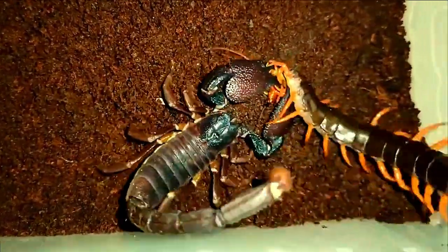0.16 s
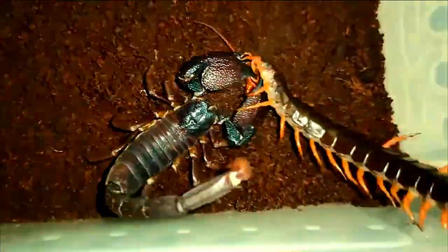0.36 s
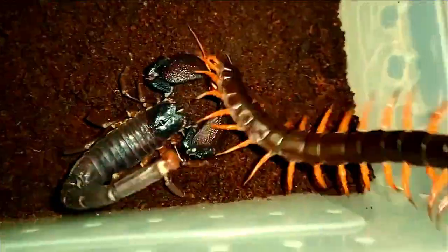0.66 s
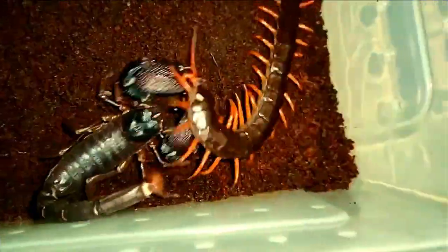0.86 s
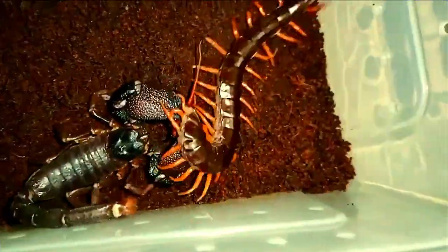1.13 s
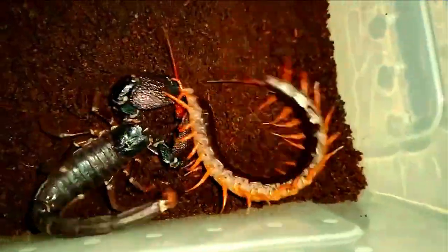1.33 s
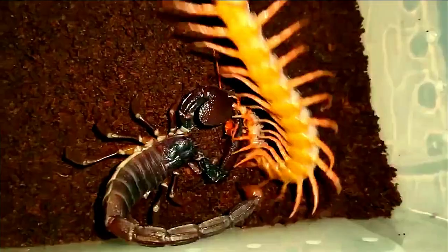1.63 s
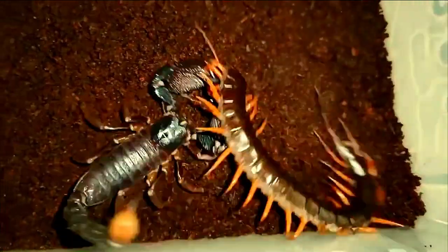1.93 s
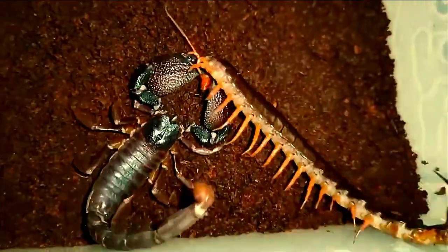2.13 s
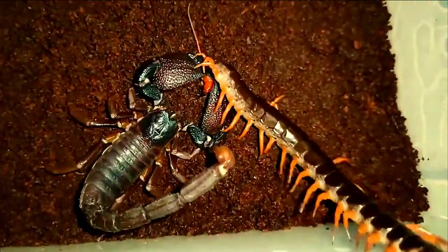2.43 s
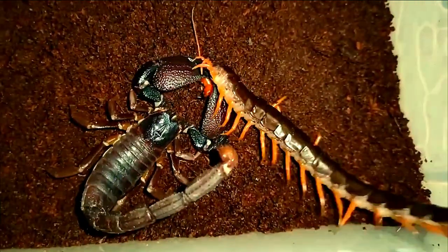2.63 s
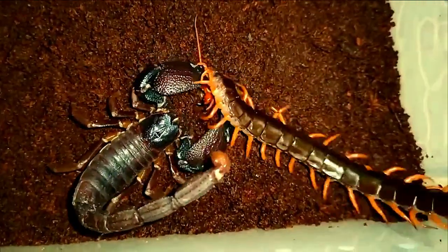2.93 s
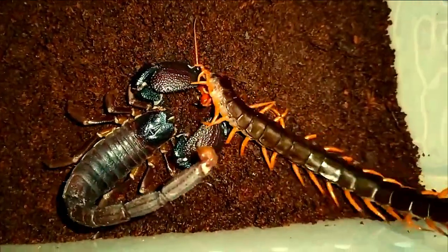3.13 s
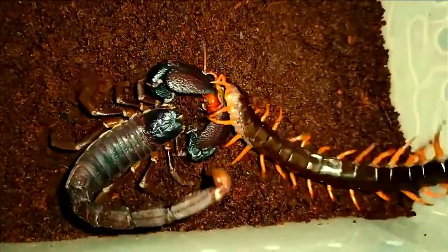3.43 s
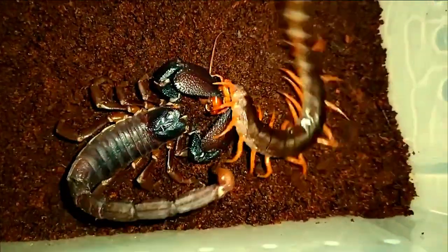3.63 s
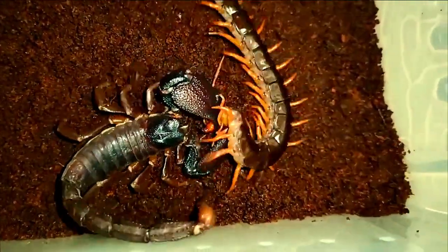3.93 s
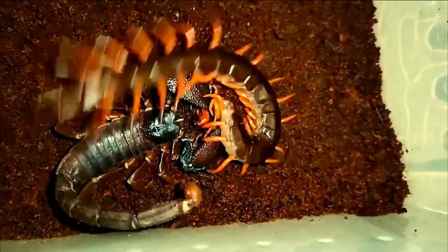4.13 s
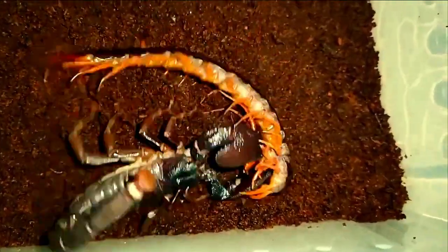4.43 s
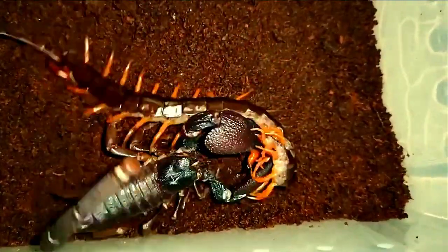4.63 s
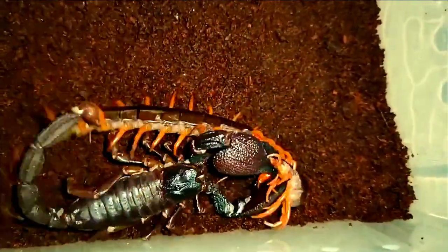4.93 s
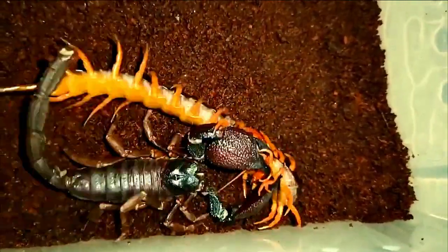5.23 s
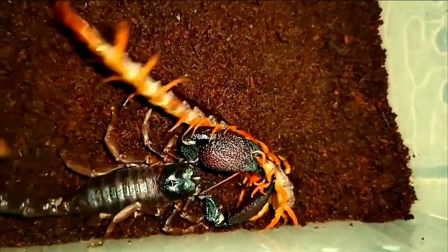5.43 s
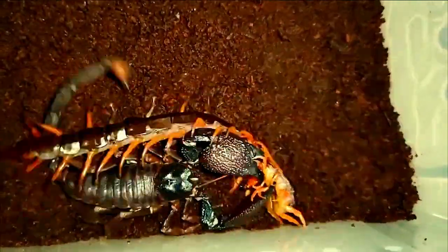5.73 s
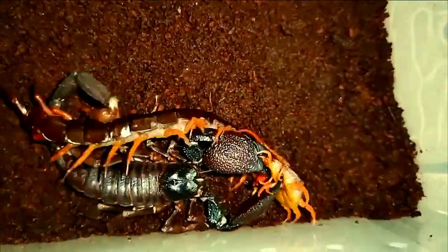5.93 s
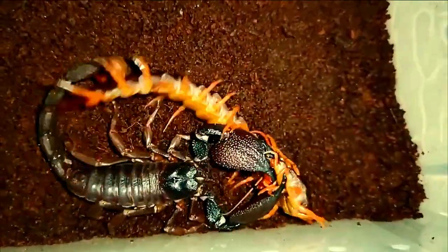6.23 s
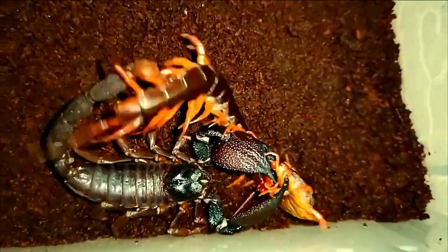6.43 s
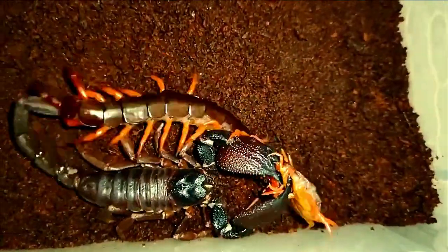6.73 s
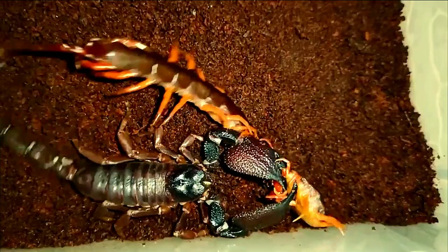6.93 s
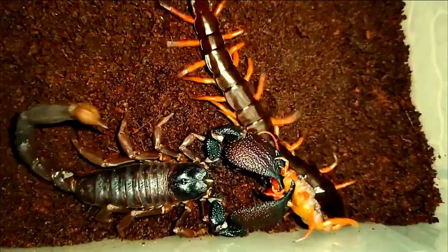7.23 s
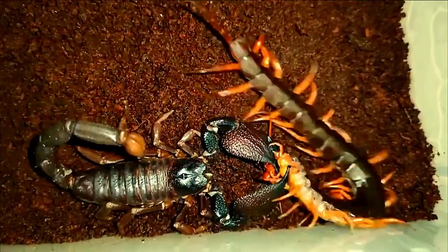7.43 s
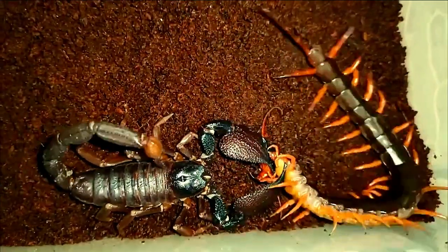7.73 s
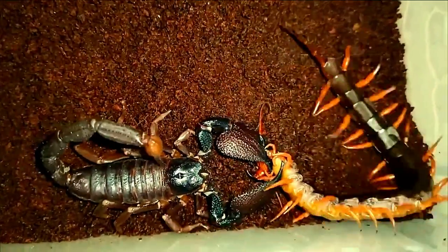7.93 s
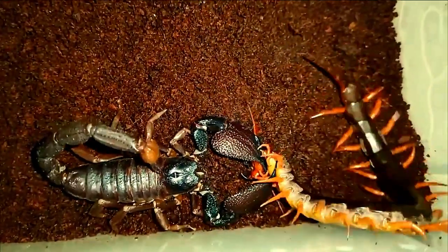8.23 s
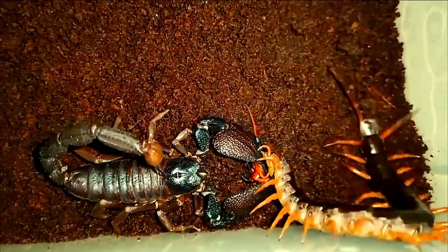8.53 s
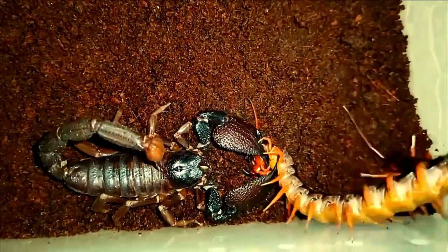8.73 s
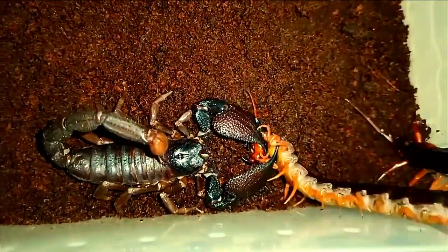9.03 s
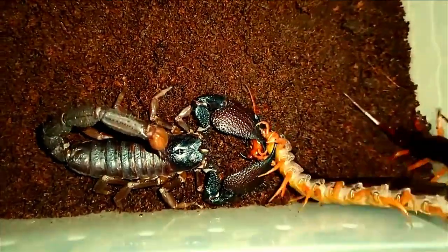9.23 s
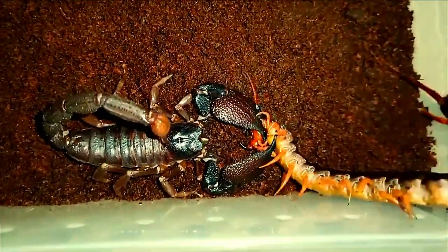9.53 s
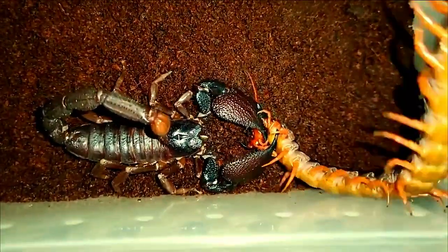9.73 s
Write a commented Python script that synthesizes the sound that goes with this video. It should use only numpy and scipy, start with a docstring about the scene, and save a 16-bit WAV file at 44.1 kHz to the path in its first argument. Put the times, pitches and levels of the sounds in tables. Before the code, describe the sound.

A close microphone catches a scuffle on loose coir in a plastic box. Dull body blows boom against the tub and leave echoing tails, strongest in the first few seconds, with one more heavy thud near the middle. Sharp claw clicks, light leg scrapes and crumbly rustle surround them. Later it becomes sparse, with delicate ticking, short chirpy squeaks and soft end knocks over low room rumble.

```python
"""Scorpion and centipede wrestling in a tub

They fight on loose coir in a plastic tub in a bare, echoing room. Body blows ring the tub modes and a noise tail.
Claws tick (clicks, small resonances) and squeak (gliding stick-slip harmonics); scrapes, short pitched clicks
and coir rustle are random slips and snaps into resonators. Room rumble, a swelling hum and hiss lie below."""
import sys
import numpy as np
from scipy import signal
from scipy.fft import rfft, irfft, next_fast_len
from scipy.io import wavfile
from scipy.ndimage import uniform_filter1d

SR = 44100
rng = np.random.default_rng(int(sys.argv[2]) if len(sys.argv) > 2 else 0)


def generate_wav(sig):
    """Save sig (samples, or channels by samples) to the path in sys.argv[1] as 16-bit PCM at SR."""
    pcm = np.round(np.clip(np.atleast_2d(sig).T, -1, 1) * 32767).astype(np.int16)
    wavfile.write(sys.argv[1], SR, pcm)


N = 435266

# Levels are relative within each source. Brightness is in rough dB per octave.
# Body blows: (time [s], blow level [dB], low-mode boom [dB], high-mode crack [dB], room tail level [dB],
#              hollowness [dB]: blows on the wall lift the tail above 600 Hz and thin it below)
THUMPS = [(.002, -29.5, 12, -2, -26.5, 0), (0.0436, -16.5, -4, -5, -24, 2.5),
          (0.0879, -14, -2, -2.5, -37, 3), (0.1455, -3.5, 6.5, -3, -20.5, -2.5),
          (0.2139, -13, -30, -21, -28.5, -3), (0.9507, -39, 4, 2, -37.5, 0.5),
          (1.147, -10.5, 7, -6, -19.5, 4), (1.298, -32, 6, 2, -31, -2), (2.075, -19, -4, 0, -29.5, 2),
          (2.088, -8.5, 4, -5.5, -24.5, 3), (2.114, -57, 52.5, 25, -32.5, -6),
          (2.3159, -25.5, 12.5, 10.5, -31, 2), (2.389, -35, 2, 16.5, -32.5, 2),
          (2.888, -17.5, 5, -2.5, -33.5, -5), (3.738, -33.5, 5, 1.5, -45, -1),
          (4.0751, -15, -2.5, -8.5, -31, 8), (4.7122, -11, 9, 1, -21, 2), (6.2734, -25.5, 3, -4, -43, -0.5),
          (7.051, -47, 0, 5.5, -55, -3.5), (7.175, -32, 7, 1.5, -43.5, 0), (7.23, -39, -8, 1, -60, 2),
          (8.9, -41, -8, 1, -52.5, -2), (9.1779, -29, -11, -3, -44.5, 5), (9.247, -36, 0, -4, -44.5, 0),
          (9.405, -41, 6, -7, -54, 2), (9.442, -50, -10, -3, -59, 0), (9.712, -47, -19, -8, -52, -1),
          (9.726, -44, -16, -1, -54, 12), (9.75, -43, -16, -5, -50, 14), (9.7958, -31.5, -22, -5, -44, 11),
          (9.823, -24.5, -22, -2.5, -41.5, 10.5), (9.858, -45, -20, 7, -26.5, 7)]
# Tub modes, damped by the coir: (frequency [Hz], level [dB], t60 [s])
TUB_MODES = [(77, -38, 0.3), (127.2, -21.5, 0.24), (219, -14.5, 0.033), (423, 3, 0.037), (527.5, 3, 0.035),
             (654, -6.5, 0.0049), (823, 0.5, 0.042), (1125, 1, 0.048), (1317, 3.5, 0.028), (1870, 8, 0.008)]
LOW_MODES_HZ, HIGH_MODES_HZ = 300, 750
WALL_MODE_SHARE = 1.05   # hollowness on the wall mode near 825 Hz
REBOUND_S, REBOUND_DB, REBOUND_BOOM_DB = .0102, -8.5, 7   # rest of the body lands: softer, heavier

# Spectrum of the room tail: (frequency [Hz], density [dB per Hz])
TAIL_SPECTRUM = [(35, -60), (60, -61), (194, -16.5), (234, 4.5), (349, -9.5), (422, 0), (530, 5),
                 (600, -16), (683, -9), (1480, -17), (3090, -26.5), (5790, -39), (9000, -61), (11700, -100),
                 (19800, -120)]
# Room decay: (frequency [Hz], t60 [s])
ROOM_T60 = [(60, 3.4), (230, 2.8), (450, 2.306), (1100, 1.89), (2000, 1.69), (3500, 1.58), (7700, 0.77)]
# Modes that stand out of the tail: (frequency [Hz], width [Hz], level [dB])
ROOM_MODES = [(175.4, 8.7, -14.5), (233.9, 23.4, -3.5), (423.4, 4.3, -3), (492, 31, -8), (681, 76, -12.5),
              (817, 16, -12.5), (1103, 52, -10.5), (1329, 64, -19), (1623, 46, -19.5), (1867, 96, -19.5)]
BUILD_UP_FADE_S = 0.0054 * 3.1
TAIL_TILT_DB, TILT_PER_CRACK = 1.78, 0.1   # dB per octave; harder blows leave brighter echoes
# Hollowness shares: lift near 700 Hz, lift from 800 Hz (gone by 5400 Hz), thinning near 450 Hz and 240 Hz
HOLLOW_LIFT_SHARE, HOLLOW_UPPER_SHARE, HOLLOW_THIN_SHARE, HOLLOW_BASS_SHARE = 0.73, 0.37, 0.58, 1.0

# Claws on armour and plastic: (time [s], peak level [dB], brightness [dB per octave])
TICKS = [(0.024, -20, 1.5), (0.051, -11.5, 1.5), (0.1045, -17, -11), (0.1177, -12, 2.5), (0.145, -5, -23),
         (0.1504, -6, 7.5), (0.169, -16, -18), (0.272, -18, 3.5), (0.308, -24.5, -4), (0.3712, -30, -13),
         (0.4021, -41, -8), (0.484, -25.5, -5), (0.5, -28, -6), (0.6174, -24, -8), (0.647, -31, -5.5),
         (0.688, -40, -8), (0.717, -27, -14), (0.7584, -29, -4), (0.8046, -35, -11), (0.89, -34, -4),
         (0.905, -31, -3), (0.913, -21, -3), (0.9489, -16, 2.5), (0.9786, -23, -8), (0.988, -29, -2),
         (1.014, -19, 5), (1.042, -20.5, 6.5), (1.1477, -8.5, -9), (1.2224, -33, -17), (1.251, -20, -15),
         (1.2819, -21, -14), (1.302, -25, -16), (1.337, -36, -5), (1.3446, -8, 16), (1.4964, -38, -10),
         (1.586, -38, -2), (1.6081, -38.5, 7), (1.629, -44, 7), (1.6436, -26, -7), (1.6664, -38, -3),
         (1.688, -38, 2), (1.766, -38, -2.5), (1.8144, -35.5, -19), (2.023, -32.5, 6), (2.049, -28, 3),
         (2.0817, -10.5, 1), (2.0902, -17, -6), (2.132, -22, 9), (2.183, -25.5, -4), (2.296, -26, -17),
         (2.313, -25.5, -3), (2.3169, -18, -12), (2.328, -30, 7), (2.35, -30, 8), (2.3556, -23, -5),
         (2.3913, -10, -9.5), (2.4288, -39, -8), (2.446, -19.5, -5), (2.459, -27, 2), (2.4685, -20.5, 6),
         (2.478, -27, 5), (2.486, -34, 7), (2.502, -21, -1), (2.556, -35, -3), (2.603, -27, 1),
         (2.665, -30, 0), (2.7121, -40, -9), (2.741, -13.5, 4.5), (2.7765, -36, 4), (2.7872, -26, 4),
         (2.8027, -28, 3), (2.8498, -25, 11), (2.8855, -17, 2), (2.891, -2.5, 2), (2.915, -27, 11),
         (3.017, -40, -11), (3.142, -32, -13), (3.16, -30, -1), (3.307, -31, -9), (3.3337, -35, -1),
         (3.347, -26.5, -7), (3.3796, -44, 9), (3.522, -27, 1), (3.6101, -46, -2), (3.625, -27.5, -10),
         (3.7394, -32, 1.5), (3.7698, -35, 1), (3.8631, -45, 12), (4.077, -22.5, -16), (4.104, -31, 16),
         (4.2, -26.5, 7.5), (4.324, -45, -20), (4.406, -25, 6), (4.4495, -21.5, 13), (4.5001, -36, 5.5),
         (4.5146, -30, 8.5), (4.5266, -30, 9), (4.549, -9.5, 12), (4.722, -7.5, -29), (4.896, -27.5, -27),
         (4.958, -24, 14), (4.9682, -14, 11), (5.004, -39, 9), (5.0753, -40, 8.5), (5.161, -31, 11),
         (5.2067, -25, 9), (5.229, -27, 12), (5.2357, -22.5, -26), (5.3108, -33, 4), (5.3254, -31, 4),
         (5.531, -29.5, 6.5), (5.607, -43, 7), (5.7135, -48, -9), (5.787, -45, 12), (5.829, -41.5, -0.5),
         (5.9248, -39, 2.5), (5.9442, -38.5, -10), (5.962, -22.5, 8), (6.092, -47, -5), (6.1215, -35, 10),
         (6.1454, -38, 9), (6.1695, -17, 15), (6.213, -34, 9), (6.217, -23, 11.5), (6.243, -35, 12),
         (6.2507, -7, 12), (6.3125, -32, -5), (6.334, -9, 12.5), (6.343, -31, 2), (6.3924, -44, 9),
         (6.4896, -41, 5), (6.504, -34.5, -4), (6.5603, -30, 8), (6.667, -39, -9), (6.768, -38.5, 1.5),
         (6.88, -35, 11), (6.908, -34, 10), (6.965, -40, 10), (7.1648, -19, 22), (7.175, -36, 0),
         (7.2, -29.5, 2), (7.217, -25, -16), (7.328, -42, -3), (7.428, -38, 0), (7.446, -28, 0.5),
         (7.5173, -49, -9), (7.5712, -53, 2), (7.649, -40, -2), (7.706, -38, -1), (7.9025, -51, -3),
         (7.927, -46, -10), (7.9842, -27.5, -5.5), (8.088, -46, -3), (8.1409, -52, 6), (8.157, -38, -1),
         (8.2252, -37, -4), (8.266, -47, 5), (8.3083, -32, -2), (8.359, -32.5, -23), (8.4318, -43, -10),
         (8.4407, -38, -9), (8.472, -30.5, -17), (8.488, -30, -6), (8.525, -28, -3), (8.681, -29.5, -5),
         (8.7024, -46, 5), (8.78, -34, 1), (8.8, -35, 0), (8.8225, -29, -2), (8.861, -26, -9),
         (8.9689, -24.5, -15), (8.993, -33, -2), (9.106, -45, -2), (9.1434, -44, -4), (9.1785, -15, 1.5),
         (9.22, -22.5, -5), (9.324, -33, -7), (9.426, -27, 3.5), (9.46, -43, -5), (9.5115, -51, 5),
         (9.542, -33, -15), (9.6477, -44, 2.5), (9.67, -31, -7), (9.675, -21, 4.5), (9.691, -46, -3),
         (9.6962, -31, -1), (9.764, -29, 0), (9.788, -31.5, -5), (9.802, -29, -0.5), (9.821, -16, -13),
         (9.844, -17, 6), (9.8664, -16.5, -7)]
# Ringing ranges of armour and tub walls: (low edge [Hz], high edge [Hz], base t60 [s])
RING_RANGES = [(2030, 5300, 0.013), (5850, 10400, 0.0098), (12160, 22600, 0.0094)]
TICK_MIDDLE_DB, RUSTLE_MIDDLE_DB = -3.5, -4   # middle range against the slope from low to high
MIDDLE_PER_BRIGHTNESS = -0.185   # bright sounds skip the middle range
TICK_COLOUR_DB = 4.5   # chance spread of each ring

# Leg drags and a few short clicks at one pitch: (time [s], nominal length [s], centre [Hz], level [dB])
SCRAPES = [(0.398, 0.074, 3140, -42.5), (0.484, 0.027, 14800, -42), (0.604, 0.041, 2930, -46.5),
           (0.947, 0.059, 7500, -46), (0.954, 0.034, 3650, -38.5), (0.955, 0.036, 2550, -44),
           (1.338, 0.13, 12700, -59), (1.637, 0.069, 5560, -58), (2.042, 0.053, 14100, -43),
           (2.449, 0.034, 4140, -42.5), (2.649, 0.017, 3340, -40.5), (3.158, 0.012, 2030, -40),
           (3.229, 0.023, 6900, -48.5), (3.374, 0.041, 6900, -51), (3.521, 0.0043, 8150, -38.5),
           (3.734, 0.04, 2000, -50.5), (4.396, 0.045, 12100, -52), (4.967, 0.089, 13200, -62),
           (5.311, 0.046, 14300, -51), (5.516, 0.043, 14800, -54), (5.93, 0.11, 8600, -66),
           (5.947, 0.09, 14200, -58), (6.086, 0.032, 3850, -60), (6.117, 0.051, 15400, -51),
           (6.489, 0.097, 3680, -63), (6.55, 0.042, 14900, -51), (6.799, 0.033, 4230, -60),
           (6.912, 0.058, 8550, -65), (7.16, 0.064, 13300, -55), (7.173, 0.077, 3130, -59),
           (7.56, 0.043, 7200, -61), (7.642, 0.11, 3420, -61.5), (7.668, 0.065, 6800, -59),
           (8.168, 0.04, 3970, -54), (8.228, 0.032, 2840, -52), (8.236, 0.054, 8200, -62),
           (8.316, 0.032, 8600, -62), (8.442, 0.039, 7640, -57), (8.627, 0.03, 8400, -50),
           (8.651, 0.038, 6400, -53), (8.733, 0.013, 9000, -37), (8.76, 0.059, 7900, -50),
           (8.867, 0.05, 8000, -52), (8.699, 0.012, 8100, -41), (8.827, 0.025, 6460, -43),
           (9.312, 0.021, 7400, -43), (9.292, 0.0099, 1900, -52), (9.548, 0.021, 3720, -49),
           (9.563, 0.062, 7100, -52), (9.704, 0.034, 3200, -44), (9.713, 0.011, 2000, -45)]
SLIPS_PER_S, SLIP_HISS, SCRAPE_RING_CYCLES = 600, .06, 26

# Claw tips slipping on the wall: (time [s], length [s], first slip rate [Hz], last slip rate [Hz],
#                                  level [dB], overtone slope [dB per harmonic])
SQUEAKS = [(2.654, 0.014, 5840, 5720, -33, -3), (2.72, 0.015, 4000, 4820, -43, -20),
           (3.194, 0.016, 4440, 4760, -40, -15), (7.67, 0.027, 1283, 1173, -56, 0.5),
           (8.168, 0.032, 4300, 4100, -48.5, -18), (8.502, 0.02, 4410, 2120, -38, -2),
           (8.528, 0.013, 4000, 2750, -41, -8), (8.7115, 0.013, 8850, 6440, -29, -23),
           (8.72, 0.024, 4850, 2867, -32.5, -0.5), (8.812, 0.026, 6150, 4020, -39.5, -7),
           (8.822, 0.018, 8230, 5230, -34.5, -14), (8.849, 0.014, 4330, 4020, -42, -14),
           (8.867, 0.036, 2850, 2600, -37.5, -5), (8.904, 0.023, 5380, 2110, -40, -5),
           (9.318, 0.03, 1767, 1136, -43.5, -0.5), (9.322, 0.014, 6550, 5500, -37, -20),
           (9.455, 0.019, 2560, 1830, -45.5, -15), (9.563, 0.0043, 7150, 6060, -37, -21)]
SQUEAK_TOP_HZ = 10500   # overtones fade above

# Legs in the coir: (time [s], rustle level [dB], brightness [dB per octave])
RUSTLE = [(0.0, -36, -4), (0.33, -47.5, -4.5), (0.78, -44, 0.5), (0.85, -51.5, -4), (1.0, -49, -1),
          (1.25, -49.5, -7), (2.0, -68, -8), (2.25, -53, -5), (3.02, -46, -1.5), (3.49, -57, 1.5),
          (3.6, -43.5, 7), (3.78, -51, 1), (3.9, -69, -0.7), (4.51, -55, 13), (4.84, -63, -4),
          (5.11, -62.5, 2.5), (5.69, -69.5, -5.5), (6.07, -68.5, 1), (8.05, -63, -9), (8.77, -48.5, 2),
          (9.02, -53, -5), (9.87, -49.5, -3)]

# Steady room noise and hiss: (frequency [Hz], density [dB per Hz])
FLOOR_SPECTRUM = [(15, -25), (25, -17.5), (79, 3), (119, 0.5), (331, -14), (433, -8), (722, -25.5),
                  (826, -14.5), (2230, -31), (4040, -36.5), (5580, -82), (11800, -39), (15500, -30)]
# Hum curve: (time [s], level [dB])
HUM = [(0.0, -68), (0.99, -54), (1.3, -42), (2.0, -45), (3.96, -38.5), (4.81, -50.5), (9.87, -44)]
FLOOR_DB = -51.5
CUTOFF_HZ = 16400


def tub():
    """Each blow is a short crumbling contact that strikes every mode with a strength of its own."""
    time_s, blow_db, boom_db, crack_db, hollow_db = np.tile(np.transpose(THUMPS)[[0, 1, 2, 3, 5]], 2)
    rebound = np.arange(len(time_s)) >= len(THUMPS)
    time_s = time_s + REBOUND_S * rebound
    blow_db = blow_db + REBOUND_DB * rebound
    boom_db = boom_db + REBOUND_BOOM_DB * rebound
    chance = rng.standard_normal((len(time_s), len(TUB_MODES)))
    crumbs = 1 + .7 * rng.standard_normal(N)
    out = 0
    for k, (hz, db, t60_s) in enumerate(TUB_MODES):
        colour_db = boom_db * (hz < LOW_MODES_HZ) + crack_db * (hz > HIGH_MODES_HZ)
        colour_db = colour_db + WALL_MODE_SHARE * hollow_db * (750 < hz < 900)
        blows = clicks(time_s, amp(blow_db + db + colour_db + 2 * chance[:, k]))
        contact = amp(-25) * fade(blows, 0.0043) * crumbs
        out = out + (-1) ** k * ring(contact, hz, t60_s)   # neighbouring modes swing opposite ways
    # a soft body dulls the contact
    return signal.sosfilt(signal.butter(2, 2600, fs=SR, output="sos"), out)


def room_tail():
    """Diffuse echoes of the thumps: noise builds up, then dies band by band; room modes stand out."""
    time_s, crack_db, tail_db, hollow_db = np.transpose(THUMPS)[[0, 3, 4, 5]]
    tilt_db = TAIL_TILT_DB + TILT_PER_CRACK * crack_db
    diffuse = coloured(TAIL_SPECTRUM)
    for hz, width_hz, db in ROOM_MODES:
        mode_t60_s = np.log(1000) / np.pi / width_hz
        diffuse = diffuse + amp(db) * rms_one(ring(rng.standard_normal(N), hz, mode_t60_s))
    edges_hz = 50 * 2 ** np.arange(0, 8.1, .5)
    out = 0
    for low, high in zip(edges_hz, edges_hz[1:]):
        hz = np.sqrt(low * high)
        lift = HOLLOW_LIFT_SHARE * (low < 700 < high)
        lift += HOLLOW_UPPER_SHARE * (hz > 800) * np.clip(np.log2(5400 / hz), 0, 1)
        lift -= HOLLOW_THIN_SHARE * (low < 450 < high) + HOLLOW_BASS_SHARE * (low < 240 < high)
        level_db = tail_db + tilt_db * np.log2(hz / 500) + lift * hollow_db
        energy = clicks(time_s, amp(level_db) ** 2)
        # energy falls 60 dB on the amplitude scale in half the t60
        energy = fade(energy, at_hz(ROOM_T60, hz) / 2) - fade(energy, BUILD_UP_FADE_S)
        out = out + np.sqrt(np.maximum(energy, 0)) * band(diffuse, low, high)
    return out


def claw_ticks():
    """A click rings small resonances of chance strength, with a gritty burst and a faint wall ring."""
    time_s, peak_db, brightness = np.transpose(TICKS)
    count = len(time_s)
    levels = three_ranges(peak_db, brightness, TICK_MIDDLE_DB)
    out = 0
    for db, (low_hz, high_hz, t60_s) in zip(levels, RING_RANGES):
        click = band(clicks(time_s, amp(db - 13) * rng.choice([-1, 1], count)), low_hz, high_hz)
        out = out + click * SR / 2 / (high_hz - low_hz)   # peak height independent of bandwidth
        for hz in np.geomspace(low_hz * 1.07 + 400, min(high_hz, CUTOFF_HZ) / 1.08, 5):
            strike_s = time_s + rng.uniform(0, .0006, count)
            hit = clicks(strike_s, amp(db - 15.5 + TICK_COLOUR_DB * rng.standard_normal(count)))
            out = out + band(ring(hit, hz, t60_s * .8), low_hz * .8, high_hz * 1.2)
        for part in narrow_rings(low_hz, high_hz):
            hit = clicks(time_s, amp(db - 13 + 3.1 * rng.standard_normal(count)))
            burst = fade(hit, t60_s * 1.74)
            wall_ring = amp(-27) * fade(hit, 0.6)
            out = out + (burst + wall_ring) * part
    return out


def scrapes():
    """Quick uneven slips ring at a few pitches around each centre: leg drags and a few short clicks."""
    out = np.zeros(N + SR)
    for start_s, length_s, hz, db in SCRAPES:
        u = np.linspace(0, 1, int(length_s * 1.4 * SR))   # tapered ends overlap the nominal length
        count = len(u)
        slip_size = amp(2.5 * np.minimum(rng.exponential(1, count), 2.5)) * rng.choice([-1, 1], count)
        slips = (rng.random(count) < SLIPS_PER_S / SR) * slip_size
        force = slips + SLIP_HISS * rng.standard_normal(count)
        ring_t60_s = SCRAPE_RING_CYCLES / hz
        rings = sum(ring(force, min(hz * share, 15400), ring_t60_s)
                    for share in rng.uniform(0.82, 1.2, size=5))
        scrape = rms_one(band(rings, hz * 0.6, hz * 1.7))
        scrape = scrape + 0.057 * rms_one(band(force, hz * 0.52, hz * 1.7))
        first = int((start_s - .2 * length_s) * SR)
        out[first:][:count] += amp(db + 1.5) * np.sin(np.pi * u) * rms_one(scrape)
    return out[:N]


def squeaks():
    """Stick-slip pulses: harmonic chirps glide, mostly down as the claw brakes, broken by chatter."""
    out = np.zeros(N + SR)
    for start_s, length_s, first_hz, last_hz, db, slope_db in SQUEAKS:
        u = np.linspace(0, 1, int(length_s * SR))
        wobble, chatter, grit = rng.standard_normal((3, len(u)))
        glide_hz = last_hz + (first_hz - last_hz) * (1 - u) ** 2.2
        hz = glide_hz * (1 + 0.29 * uniform_filter1d(wobble, size=60))
        phase = 2 * np.pi * np.cumsum(hz) / SR
        tone = 0
        for k in range(6):
            ripple_db = 2.1 * np.sin(rng.uniform(23.0, 26.0) * u + rng.uniform(0, 12.3))
            rolloff = 1 + ((k + 1) * hz / SQUEAK_TOP_HZ) ** 6
            tone = tone + amp(slope_db * k + ripple_db) / rolloff * np.sin((k + 1) * phase)
        tone = tone * amp(26 * uniform_filter1d(chatter, size=90)) * (1 + .4 * grit)
        swell = np.sin(np.pi * u ** .7) ** 0.6
        out[int(start_s * SR):][:len(u)] += amp(db) * swell * tone
    out = out[:N] - band(out[:N], 11200, 11500)   # the tub is deaf near 11 kHz
    wall = amp(-46) * rms_one(ring(rng.standard_normal(N), 5750, .05))
    # the first slip leaves a wall mode ringing
    return out + wall * fade(clicks([SQUEAKS[0][0] + .01], 0.33), 0.64)


def rustle():
    """Fibres snap in clumps over a patchy shuffle; snaps ring small resonances of coir and armour."""
    born = rng.random(N) < 600 * amp(8 * drift(18)) / SR   # median 600 snaps per s
    sizes = born * amp(4.5 * np.minimum(rng.exponential(1, N), 3.5)) * rng.choice([-1, 1], N)
    levels = three_ranges(*in_time(RUSTLE), RUSTLE_MIDDLE_DB)
    out = 0
    for db, (low_hz, high_hz, t60_s) in zip(levels, RING_RANGES):
        scrape = drift(14)
        shuffle = sum(amp(3.5 * scrape + 2.5 * drift(60)) * part
                      for part in narrow_rings(low_hz, high_hz, count=2))
        pitches_hz = np.geomspace(low_hz * 1.08, high_hz / 1.05, 10)
        # each pitch takes a random 30 % of the snaps
        snaps = sum(ring(sizes * (rng.random(N) < .3) + 1e-18, hz, t60_s * 0.45) for hz in pitches_hz)
        out = out + amp(db) * (amp(-6.5) * shuffle + amp(-1) * rms_one(snaps))
    # coir shoved aside
    shifting = rms_one(band(rng.standard_normal(N), 306, 2360))
    shifting = amp(levels[0] - 12 + 0.43 * drift(7.4)) * shifting
    # crumbs knock on the floor of the tub
    crumbs = sum(ring(sizes * (rng.random(N) < .25) + 1e-18, hz, 20 / hz)
                 for hz in np.geomspace(500, 2000, 6))
    return out + shifting + amp(levels[0] - 10.5) * rms_one(crumbs)


def background():
    """Steady room noise and hiss, with a low hum of two narrow noise tones that swells and fades."""
    hum = rms_one(ring(rng.standard_normal(N), 57.02, 3.1))
    hum = hum + rms_one(ring(rng.standard_normal(N), 78.97, 2.2))
    return amp(FLOOR_DB) * coloured(FLOOR_SPECTRUM) + amp(in_time(HUM)[0] - 7.5) * hum


def three_ranges(db, brightness, middle_db):
    """Low, middle, high range levels: the favoured end gets the full level, the rest slope away."""
    low = db - 2 * np.maximum(brightness, 0)
    high = db + 2 * np.minimum(brightness, 0)
    middle = (low + high) / 2 + middle_db + MIDDLE_PER_BRIGHTNESS * brightness
    return low, middle, high


def narrow_rings(low_hz, high_hz, count=3):
    """Noise in neighbouring narrow bands that share out a range, rms about 1 together."""
    edges_hz = np.geomspace(low_hz, high_hz, count + 1)
    return [rms_one(band(rng.standard_normal(N), low, high)) / np.sqrt(count)
            for low, high in zip(edges_hz, edges_hz[1:])]


def amp(db):
    """Gain of a level in dB."""
    return 10 ** (np.asarray(db, float) / 20)


def rms_one(x):
    """Scale to unit rms."""
    return x / np.sqrt(np.mean(x ** 2) + 1e-20)


def in_time(rows):
    """Columns of a curve table, one value per sample."""
    time_s, *columns = np.transpose(rows)
    return [np.interp(np.arange(N) / SR, time_s, column) for column in columns]


def at_hz(points, hz):
    """Read a table on a log-frequency axis."""
    table_hz, values = np.transpose(points)
    return np.interp(np.log(hz), np.log(table_hz), values)


def clicks(times_s, gains):
    """Impulses at the given seconds."""
    out = np.full(N, 1e-18)
    np.add.at(out, np.clip((np.asarray(times_s) * SR).astype(int), 0, N - 1), gains)
    return out


def ring(x, hz, t60_s):
    """Two-pole resonator: a unit click sets a decaying sine of height about 1 ringing."""
    r, w = amp(-60 / (t60_s * SR)), 2 * np.pi * hz / SR
    return signal.lfilter([0, np.sin(w)], [1, -2 * r * np.cos(w), r * r], x)


def fade(x, t60_s):
    """One-pole decay: each impulse dies away by 60 dB in t60."""
    return signal.lfilter([1], [1, -amp(-60 / (t60_s * SR))], x)


def band(x, low_hz, high_hz):
    """Butterworth band-pass."""
    sos = signal.butter(2, [low_hz, min(high_hz, .45 * SR)], "band", fs=SR, output="sos")
    return signal.sosfilt(sos, x)


def coloured(spectrum):
    """Noise with the given spectrum, rms 1."""
    size = next_fast_len(N)
    hz = np.maximum(np.arange(size // 2 + 1) * SR / size, 1)
    shaped = rfft(rng.standard_normal(size)) * amp(at_hz(spectrum, hz))
    return rms_one(irfft(shaped, size)[:N])


def drift(rate_hz):
    """Slow chance: normal points of spread 1 at the given rate, joined by straight lines."""
    points = rng.standard_normal(int(N / SR * rate_hz) + 2)
    return np.interp(np.arange(N) / SR * rate_hz, np.arange(len(points)), points)


def scene():
    """All sources at one close microphone."""
    return (tub() + room_tail() + claw_ticks() + scrapes() + squeaks() + rustle() + background())[None]


def record(dry):
    """High-pass the deepest bass, clip beyond full scale, low-pass steeply near 16.4 kHz."""
    thin = signal.sosfilt(signal.butter(3, 48, "high", fs=SR, output="sos"), dry)
    low_pass = signal.cheby2(14, 60, CUTOFF_HZ, fs=SR, output="sos")
    return signal.sosfilt(low_pass, np.clip(thin, -1, 1))


dry = scene()
out = record(dry)
generate_wav(out)
```